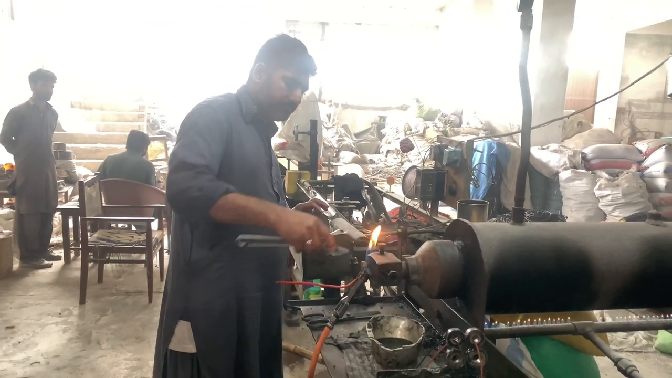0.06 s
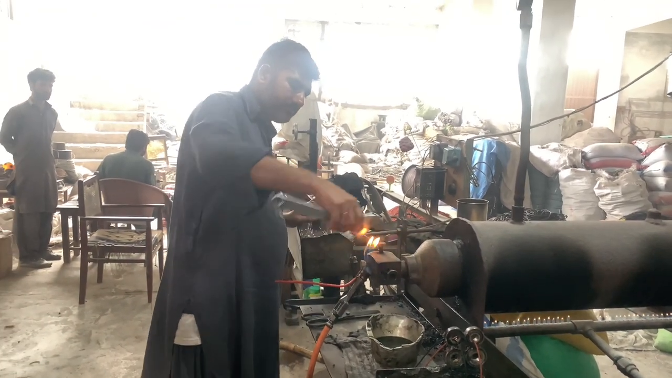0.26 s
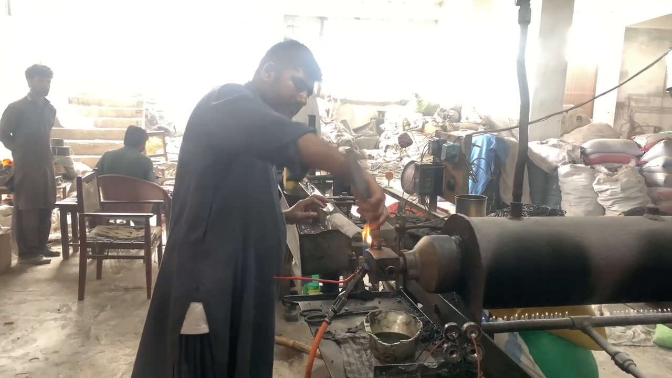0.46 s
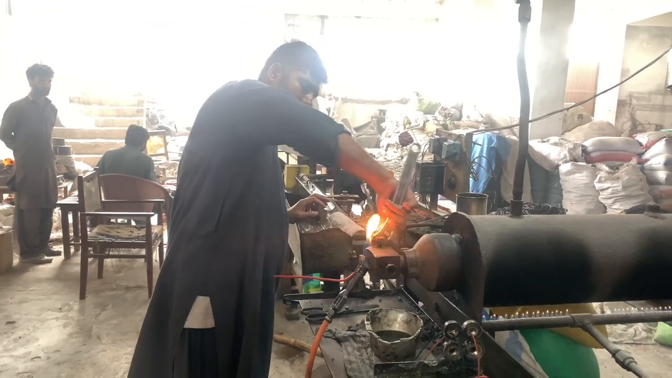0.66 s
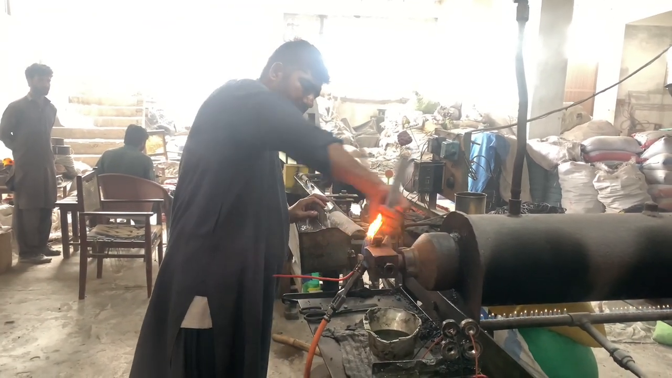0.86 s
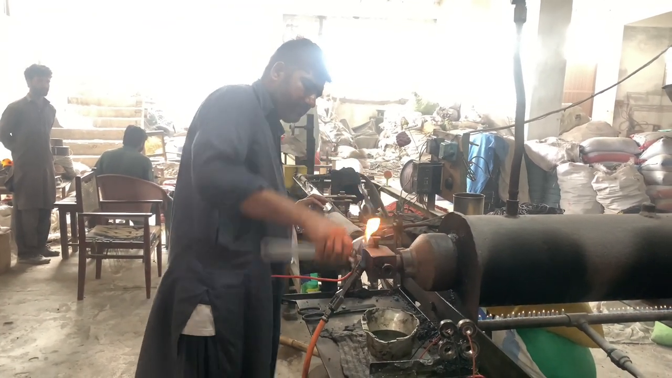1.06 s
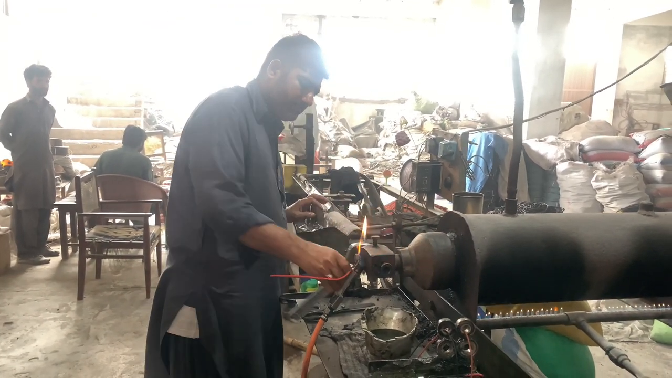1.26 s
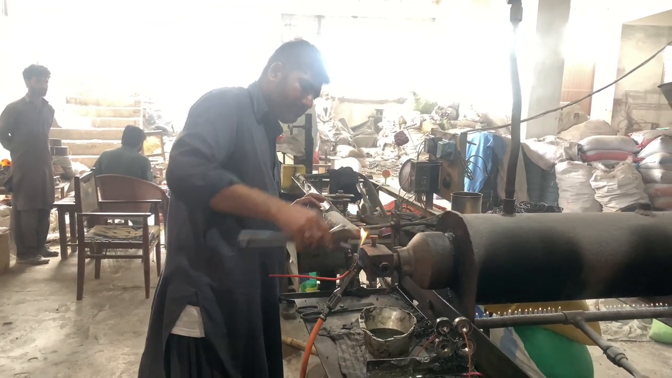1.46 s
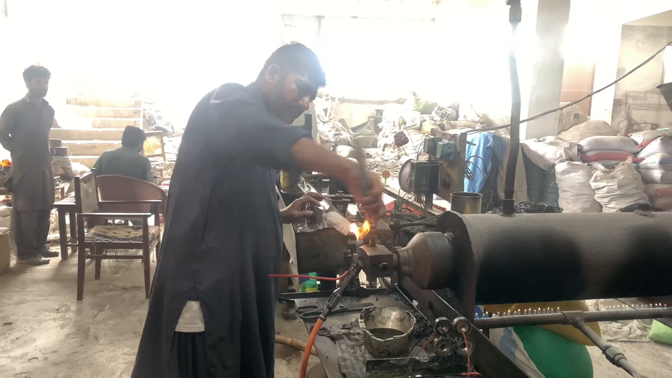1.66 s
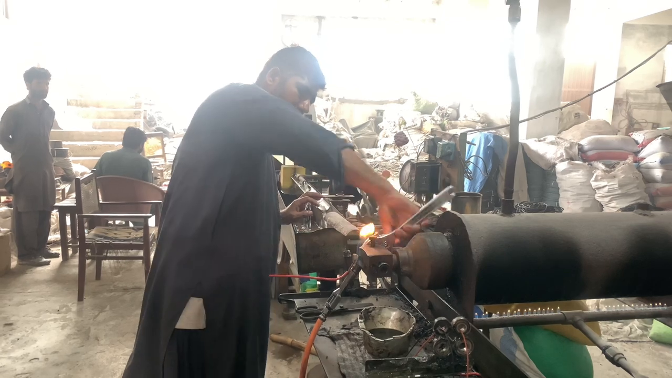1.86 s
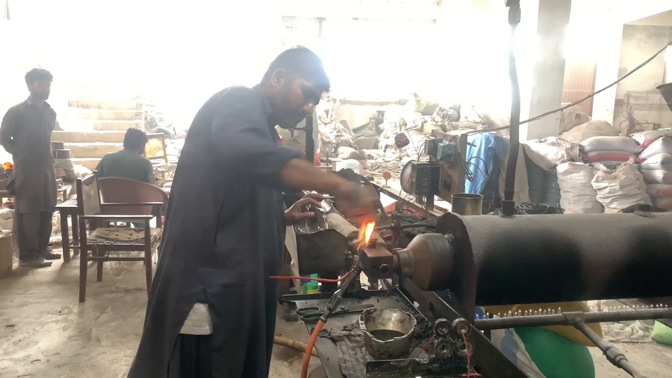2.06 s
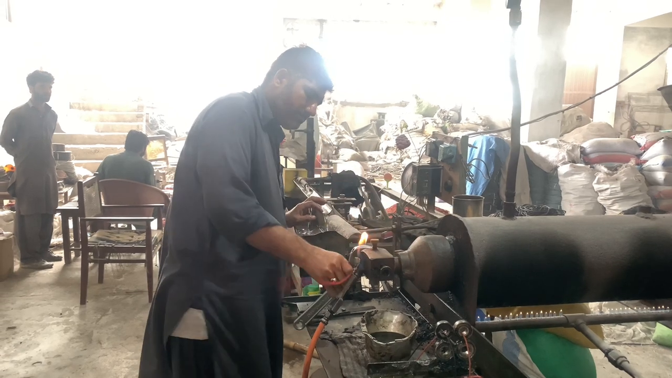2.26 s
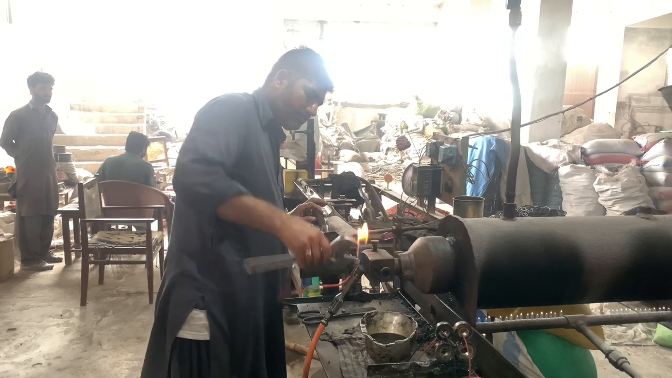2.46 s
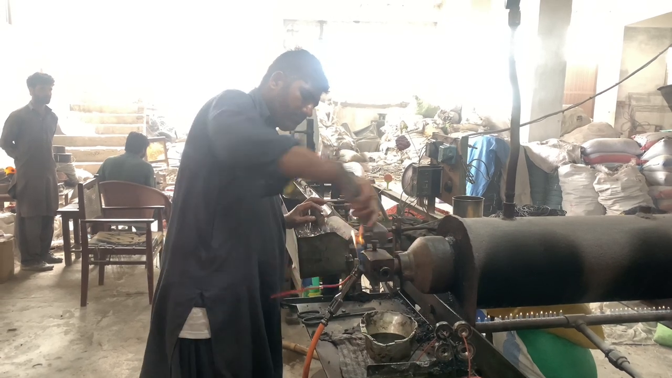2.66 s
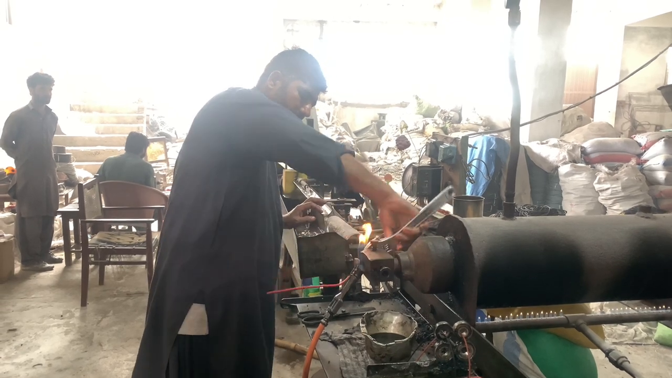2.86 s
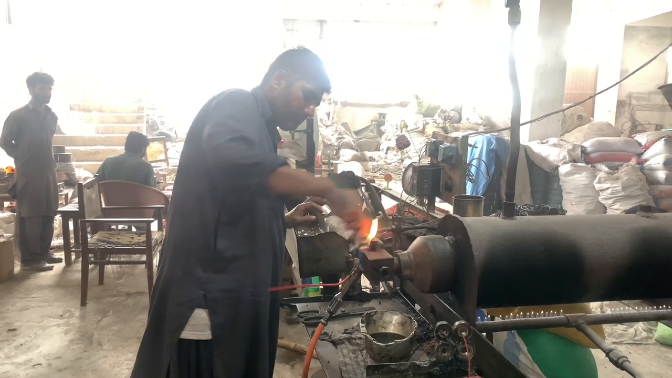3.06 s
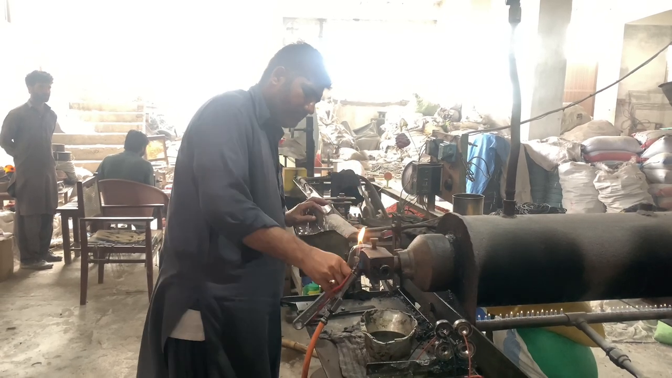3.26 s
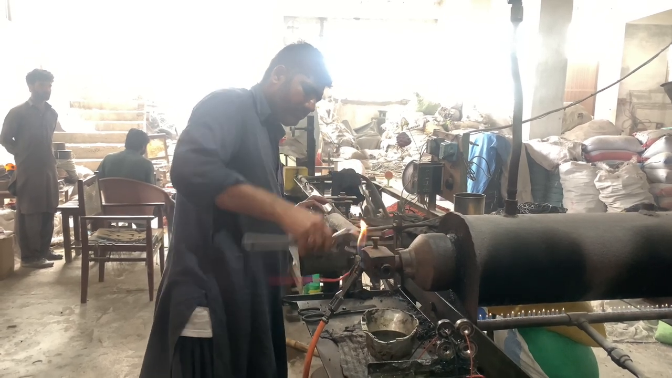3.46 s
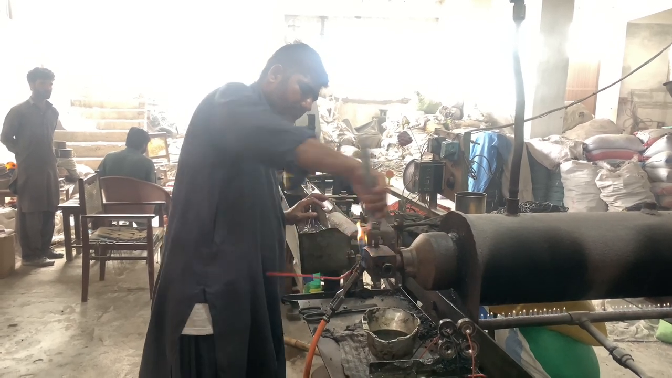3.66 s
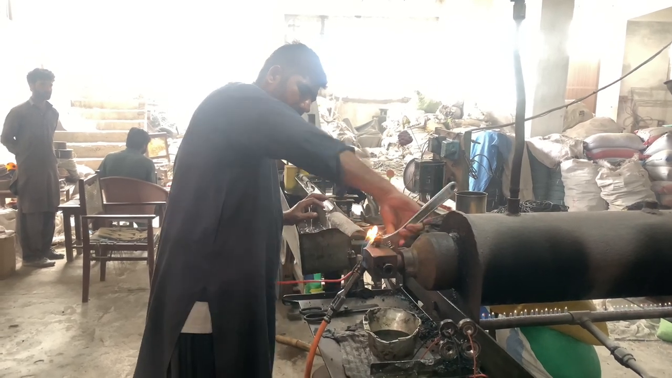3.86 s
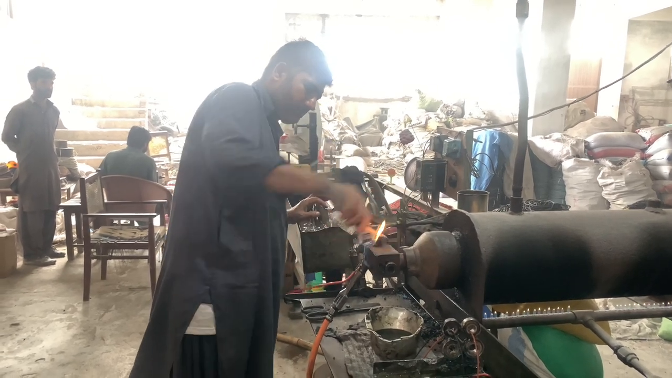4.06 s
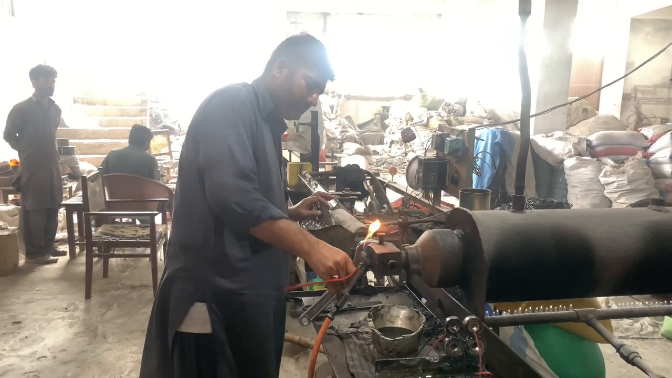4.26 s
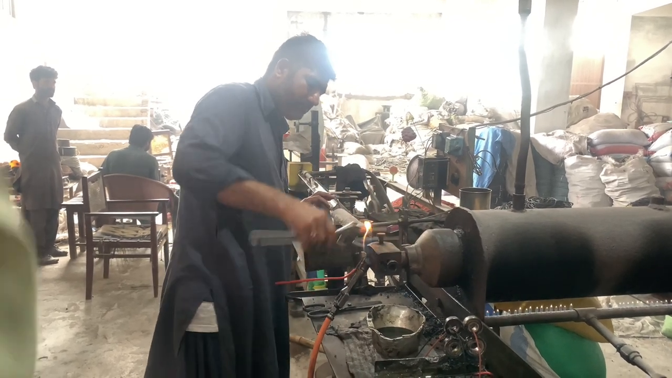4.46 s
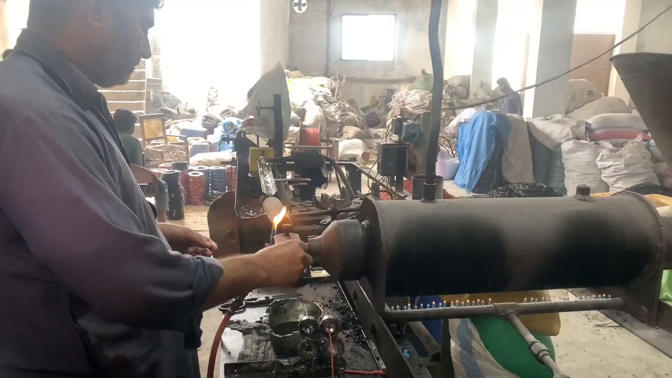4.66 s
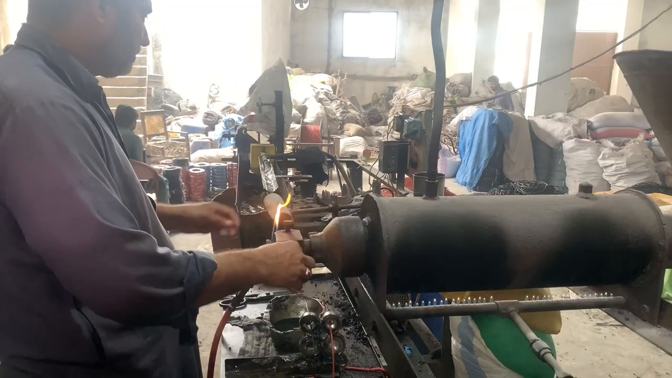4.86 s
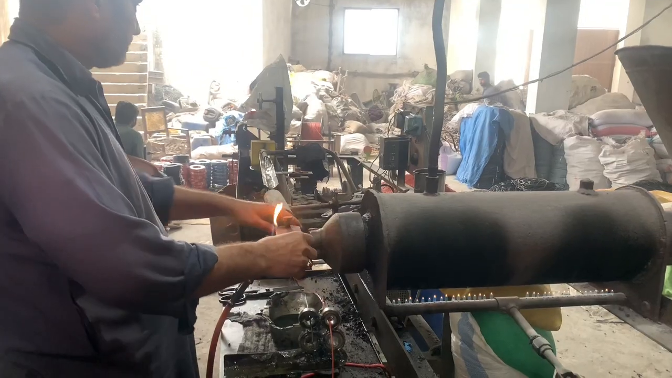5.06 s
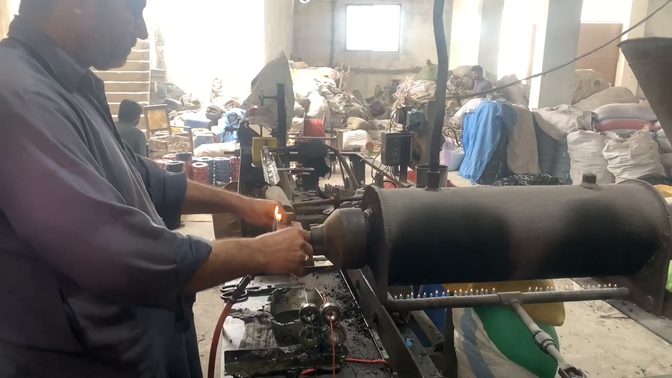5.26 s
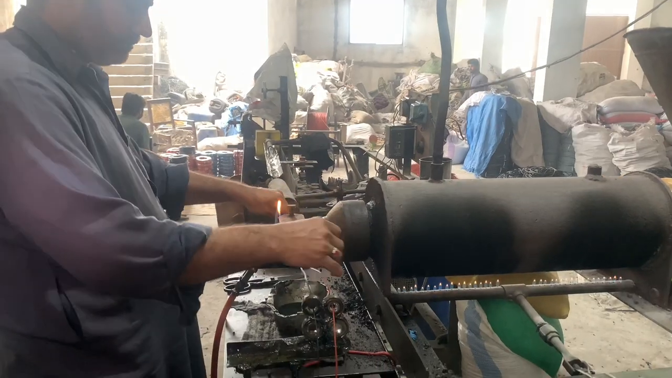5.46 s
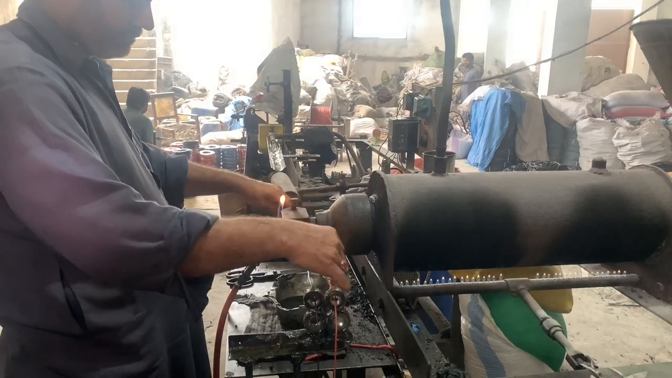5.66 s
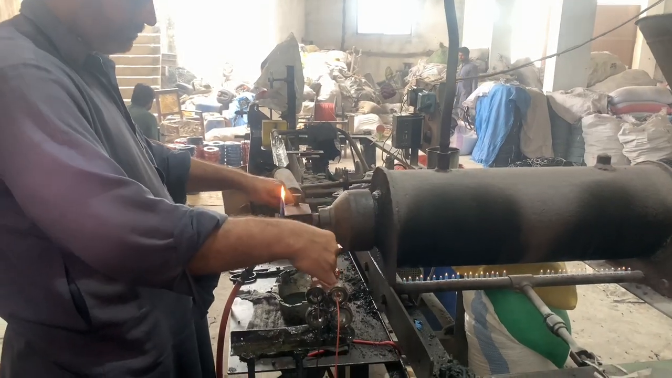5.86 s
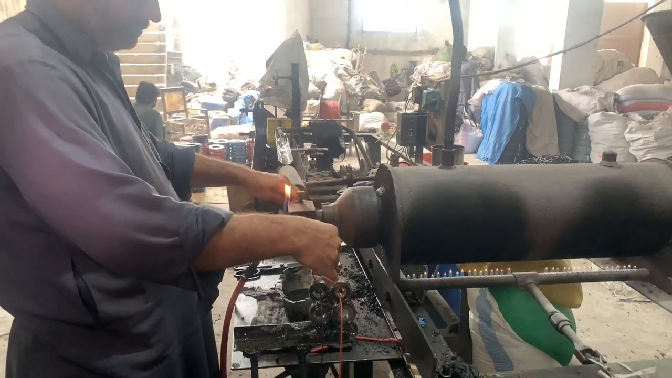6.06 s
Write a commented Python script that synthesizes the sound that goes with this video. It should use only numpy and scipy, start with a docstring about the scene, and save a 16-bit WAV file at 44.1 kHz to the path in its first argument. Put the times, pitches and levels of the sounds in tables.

```python
"""The hum and rumble of a running plastic extruder come first, in a factory hall: wavering sines and shaped noise.
A worker's flat hand tool clinks, skids and knocks on the die: ringing modes with short bursts of gritty noise.
Between these light touches it strikes the steel head four times: noise cracks, a rattle and dying modes.
Each blow makes the recorder's limiter duck. After a brief near-silence the machine is nearer,
and a soft sizzle, noise with faint resonances, swells twice."""
import sys
import numpy as np
from scipy import signal
from scipy.fft import rfft, irfft
from scipy.io import wavfile
from scipy.ndimage import uniform_filter1d, minimum_filter1d

SR = 44100
rng = np.random.default_rng(int(sys.argv[2]) if len(sys.argv) > 2 else 0)


def master(y):
    """Save y as 16-bit WAV."""
    cut = np.clip(np.atleast_2d(y).T, -1, 1)
    pcm = np.round(cut * 32767)  # scale
    wavfile.write(sys.argv[1], SR, pcm.astype(np.int16))


N = 269010
SILENCE_START_S, SILENCE_END_S = 4.554, 4.582  # the machine is heard from nearer after the start


def amp(db):
    """Turns decibels into an amplitude factor."""
    return 10 ** (np.asarray(db) / 20)


def evened(x):
    """Scales to rms 1."""
    return x / np.sqrt(np.mean(x ** 2) + 1e-20)


def read(points, hz):
    """Reads a curve at the given frequencies, on a log frequency axis."""
    f, value = np.transpose(points)
    return np.interp(np.log(hz + 1), np.log(f + 1), value)


def add(mix, s, sound):
    """Mixes a stereo sound in at s seconds."""
    part = mix[:, round(s * SR):][:, :sound.shape[1]]
    part += sound[:, :part.shape[1]]


def fade(t, t60):
    """Dies by 60 dB in t60 seconds."""
    return np.exp(-np.log(1000) * t / t60)


def drift(rate_hz):
    """Random wavering, mostly slower than rate_hz, rms 1."""
    hz = np.fft.rfftfreq(N, 1 / SR)
    spectrum = rfft(rng.standard_normal(N)) * np.exp(-(hz / rate_hz) ** 2)
    return evened(irfft(spectrum, N))


def tilt(hz, slope_db):
    """Brightness: slope_db per octave about 3 kHz, flat below 2 kHz."""
    return slope_db * np.log2(max(hz, 2000) / 3000)


def tilted(colour, slope_db):
    """A noise colour with its brightness tilted."""
    return [(hz, db + tilt(hz, slope_db)) for hz, db in colour]


# left-right likeness of noise: [f/Hz, likeness from -1 to 1, clipped to that range]
LIKENESS = [(40, 1.2), (90, 0.76), (180, 1.04), (350, 0.21), (600, -0.1), (1500, -0.21), (5000, 0.11),
            (14000, 0)]
# left-right balance of noise and modes: [f/Hz, level/dB of left over right]
BALANCE = [(60, 1), (300, 0.5), (650, 7), (1300, 1.5), (2400, 1.5), (4400, -2), (8000, -3.5), (15000, 1)]


def noise(colour, size):
    """Coloured noise at two microphones, rms 1: alike in the bass, unrelated in the treble."""
    hz = np.fft.rfftfreq(size, 1 / SR)
    a, b = rfft(rng.standard_normal((2, size)))
    same = np.clip(read(LIKENESS, hz), -1, 1)
    half_lean_db = read(BALANCE, hz) / 2
    left = a * amp(half_lean_db)
    right = (same * a + np.sqrt(1 - same ** 2) * b) * amp(-half_lean_db)
    return evened(irfft(np.array([left, right]) * amp(read(colour, hz)), size))


def ring(modes, t, tilt_db, spread, detune):
    """Dying modes, detuned a little by each contact; the higher ones reach the two microphones out of step."""
    out = np.zeros((2, len(t)))
    side = np.array([[.5], [-.5]])
    for hz, db, t60 in modes:
        lag = side * spread * min(hz / 2500, 1) * rng.choice([-1, 1])  # radians
        phase = 2 * np.pi * rng.random() + lag
        level_db = db + tilt_db * np.log2(hz / 3000) + side * read(BALANCE, hz)
        pitch_hz = hz * (1 + detune * rng.uniform(-1.6, 1))
        out += amp(level_db) * fade(t, t60) * np.sin(2 * np.pi * pitch_hz * t + phase)
    return out


# colour of the machine noise from the first place: [f/Hz, relative level/dB]
FAR_COLOUR = [(12, -43), (20, -16.5), (80, -2), (129, -9.5), (185, -2.5), (372, -12.5), (519, -11),
              (834, -17), (1720, -19), (1870, -20.5), (8640, -42.5), (9660, -40), (11700, -55),
              (13100, -45), (15500, -68)]
# colour of the machine noise from nearer: [f/Hz, relative level/dB]
NEAR_COLOUR = [(12, -56), (20, -14), (76, -2.5), (180, -6.5), (225, -9), (266, -3.5), (958, -21),
               (1340, -20), (1980, -25), (2400, -29), (2610, -29), (4190, -35), (6190, -46), (13100, -49.5),
               (15500, -87)]
# motor hum partials: [multiple of the motor frequency, rms level/dB before wavering and distance]
HUM_PARTIALS = [(1, -50.5), (2, -53.5), (3, -56), (7, -72)]
MOTOR_HZ = 88.06  # before wavering
FAR_DB, NEAR_DB = -38.5, -37.5  # noise level, before the sink
HUM_FAR_DB, HUM_NEAR_DB = 0.5, 6  # added to the partials
SINK_AT_S, SINK_S, SINK_DB = 2.2, 0.25, -7  # the machine sinks about the second blow and stays low till nearer


def machine():
    """Rumble and burner roar, with the wavering hum of the motor, which is stronger from nearby."""
    t = np.arange(N) / SR
    near = t > SILENCE_START_S
    roar = np.where(near, amp(NEAR_DB) * noise(NEAR_COLOUR, N), amp(FAR_DB) * noise(FAR_COLOUR, N))
    roar = roar * amp(0.59 * drift(50))
    turns = np.cumsum(MOTOR_HZ * (1 + 0.0083 * drift(4.06))) / SR
    hum = np.zeros(N)
    for multiple, db in HUM_PARTIALS:
        wave = np.sin(2 * np.pi * (round(multiple) * turns + rng.random()))
        hum += amp(db + 0.49 * drift(13)) * np.sqrt(2) * wave
    hum = hum * amp(np.where(near, HUM_NEAR_DB, HUM_FAR_DB))
    sunk = np.clip((t - SINK_AT_S) / SINK_S, 0, 1) * ~near
    return amp(SINK_DB * sunk) * (roar + hum)


# colour of the fizz: [f/Hz, relative level/dB]
SIZZLE_COLOUR = [(300, -0.5), (900, 1.5), (2100, 1.5), (4000, -3.5), (6000, -12), (10500, -16),
                 (12000, -36), (13500, -23), (15500, -49)]
# faint resonances in the sizzle: [f/Hz, width/Hz, boost level/dB]
SIZZLE_RINGS = [(1055, 40, 7), (1900, 24, 21), (2035, 22, 12), (2190, 18, 17)]
# swells: [t/s, rise/s, top level/dB, fall/(dB/s), brightness/(dB/octave), squeal share at the start 0-1]
SWELLS = [(5.21, 0.037, -41.5, 24, -1.5, 0.17), (5.46, 0.15, -41, 42, 1, 0.27)]
SQUEAL_GROWTH_PER_S = 6.7  # in units of the starting share


def sizzle():
    """A soft fizz that swells twice and dies away; a faint squeal of narrow resonances grows in it."""
    hz, out = np.fft.rfftfreq(N, 1 / SR), np.zeros((2, N))
    rings_db = sum(db / (1 + (2 * (hz - centre) / width) ** 2) for centre, width, db in SIZZLE_RINGS)
    for s, rise, top_db, fall_db, slope_db, squeal in SWELLS:
        age = np.arange(N) / SR - s
        plain = noise(tilted(SIZZLE_COLOUR, slope_db), N)
        ringing = irfft(rfft(plain) * amp(rings_db), N)
        share = np.clip(squeal * (1 + SQUEAL_GROWTH_PER_S * age), 0, 1)
        level = np.clip(age / rise, 0, 1) * amp(top_db - fall_db * np.maximum(age - rise, 0))
        out += level * (plain + share * (ringing - plain))
    return out * amp(1.0 * drift(29))


# modes of the hand tool: [f/Hz before detuning, relative level/dB, t60/s before the hand damps it]
TOOL_MODES = [(2370, 1, 0.13), (3280, -21, 0.029), (3783, -2, 0.062), (3864, -5, 0.078), (4460, -8, 0.064),
              (5380, -11.5, 0.17), (6120, -14, .08), (6290, -13, 0.057), (6850, -19, 0.033),
              (8010, -13, 0.084), (9660, -10, 0.045), (9650, -5, 0.028), (10710, -8.5, 0.031),
              (13820, -14, .025)]
SPOT_DB, SPOT_WIDTH_HZ = 10.5, 200  # the spot of contact favours the modes near one frequency


def tool_ring(t, slope_db, spot_hz, spread, detune):
    """The tool's modes as one spot of contact excites them, rms 1 at the start."""
    modes = []
    for hz, db, t60 in TOOL_MODES:
        favour_db = SPOT_DB * np.exp(-((hz - spot_hz) / SPOT_WIDTH_HZ) ** 2)
        modes.append((hz, db + favour_db + 1.4 * rng.standard_normal(), t60))
    tone = ring(modes, t, slope_db, spread, detune)
    return tone / tone[:, :SR // 100].std()


# colour of the grit of a skidding edge: [f/Hz, relative level/dB]
GRIT_COLOUR = [(500, 5), (2400, 8), (3100, 6), (3900, 16), (4900, 1), (6800, 8.5), (8900, -10.5),
               (9700, 7.5), (11500, -24), (12700, 2), (14000, -25), (15600, -17)]


def touch(contact_s, slope_db, ring_db, spot_hz):
    """The tool slides for a moment: its ring builds as the contact decays, under a gritty hiss."""
    t = np.arange(SR // 4) / SR
    contact = np.exp(-t / contact_s)
    tone = tool_ring(t, slope_db - 0.5, spot_hz, spread=0.7, detune=0.0049) * (1 - contact ** 4)
    tone *= fade(t, 0.16)  # the hand damps the tool
    grit_level = (contact + amp(-4.5) * fade(t, 0.0092)) * (1 - fade(t, 0.012))
    grit = noise(tilted(GRIT_COLOUR, slope_db), len(t)) * grit_level
    return amp(ring_db) * tone + grit


# single light touches: [t/s, level/dB, brightness/(dB/octave), ring level/dB against the grit]
CLINKS = [(0.212, -40, 11, -3.5), (0.418, -41.5, -2.5, 2), (0.43, -36.5, -3, 0), (0.458, -39, -5, -1),
          (0.508, -28, -1.5, -1.5), (0.5771, -29, 0, -12), (0.6813, -41, 3, 7), (2.156, -41.5, 8, -8),
          (3.138, -50, 5, -17)]


def clinks():
    """The tool ticks against the die, each a brief ringing touch."""
    out = np.zeros((2, N))
    for s, level_db, slope_db, ring_db in CLINKS:
        add(out, s, amp(level_db) * touch(0.006, slope_db, ring_db, spot_hz=3630))
    return out


# skids: [landing t/s, landing level/dB, brightness/(dB/octave), graze level/dB against the landing]
SKIDS = [(1.6867, -27.5, 0.5, -13), (2.687, -35, 5.5, -26), (3.683, -37, 1, -8)]
GRAZE_LEAD_S, GRAZE_CONTACT_S = 0.056, 0.02
BOUNCE_S, BOUNCE_DB, SKID_CONTACT_S = 0.0145, -3.5, 0.0089


def skids():
    """Three touches in a row: a soft graze, the skidding landing and a bounce."""
    out = np.zeros((2, N))
    for s, level_db, slope_db, graze_db in SKIDS:
        graze = (-GRAZE_LEAD_S, graze_db, GRAZE_CONTACT_S)
        landing = (0, 0, SKID_CONTACT_S)
        bounce = (BOUNCE_S, BOUNCE_DB, SKID_CONTACT_S)
        for delay, db, contact_s in (graze, landing, bounce):
            sound = touch(contact_s, slope_db, ring_db=2.5, spot_hz=4480)
            add(out, s + delay, amp(level_db + db) * sound)
    return out


# firm knocks: [t/s, level/dB, brightness/(dB/octave), ring level/dB against the clack, favoured mode f/Hz]
KNOCKS = [(0.7285, -23.5, -0.5, 1, 2380), (1.8436, -27, -6.5, -1, 4480), (2.8482, -23.5, 2.5, -8, 6160),
          (3.8359, -31, 0.5, -4, 2380)]
# colour of the dead clack: [f/Hz, relative level/dB]
CLACK_COLOUR = [(200, -20), (800, 0), (1700, 2.5), (2300, -7), (2800, -25.5), (3350, 12), (4100, -15),
                (6500, -6), (9000, -19.5), (9900, -3.5), (11500, -29), (13300, -19), (16000, -44)]
KNOCK_RING_TILT_DB = -0.5  # per octave: the knock's ring is barely duller than its clack


def knocks():
    """Pressed hard on the die, the tool clacks and its ring is damped."""
    out, t = np.zeros((2, N)), np.arange(SR // 4) / SR
    for s, level_db, slope_db, ring_db, spot_hz in KNOCKS:
        tone = tool_ring(t, slope_db + KNOCK_RING_TILT_DB, spot_hz, spread=.4, detune=0.0028)
        tone = tone * fade(t, 0.043)
        clack = noise(tilted(CLACK_COLOUR, slope_db), len(t)) * fade(t, 0.022) * (1 - fade(t, 0.0007))
        add(out, s, amp(level_db) * (clack + amp(ring_db) * tone))
    return out * amp([[1.2], [-1.2]])  # a little to the left


# heavy blows: [t/s, force level/dB, rebound delay/s, rebound level/dB against the blow, brightness/(dB/octave)]
BLOWS = [(1.1433, 2, 0.0044, 1.5, 0), (2.2304, -4.5, 0.0038, -7.5, -1), (3.2115, -4.5, .004, -4, -0.5),
         (4.2019, -6, 0.0056, -0.5, -0.5)]
# modes of the struck head: [f/Hz before detuning, relative level/dB, t60/s]
HEAD_MODES = [(1070, -26, 0.15), (1161, -15.5, 0.091), (1759, -14.5, 0.065), (1920, -10, 0.041),
              (2110, -18, 0.2), (2128, -21, 0.2), (2464, -7.5, 0.098), (2543, 0, 0.052), (2670, 3.5, 0.021),
              (2826, -8, 0.038), (3002, 2, 0.032), (3308, -5, 0.092), (3584, -5, 0.034),
              (3840, -7.5, 0.067), (4270, -16.5, 0.14), (4314, -8.5, 0.037), (4566, -10.5, 0.074),
              (4955, -13.5, 0.075), (5040, -11.5, 0.037), (5300, -14, 0.06), (5760, -17, 0.086),
              (6070, -17, 0.08), (6405, -8.5, 0.027), (6380, -17, 0.031), (7400, -10, 0.031),
              (7800, -15, 0.069), (8370, -14, 0.09), (8600, -25, 0.024), (9230, -18.5, 0.063),
              (10340, -24, 0.068)]
# colour of the dense crack of steel on steel: [f/Hz, relative level/dB]
CRACK_COLOUR = [(50, -24), (170, 4.5), (450, -12), (800, 3), (1500, -0.5), (2600, 6.5), (4000, 8.5),
                (6300, -21.5), (7500, -14), (10500, -2.5), (12000, -20), (14000, -11), (15500, -51)]
# colour of the machine's short rattle after each crack: [f/Hz, relative level/dB]
RATTLE_COLOUR = [(400, -16), (800, -9), (1500, -0.5), (2700, -1.5), (4300, -2.5), (6500, 4), (10500, -28),
                 (15000, -33)]
HEAD_DB, CRACK_DB, RATTLE_DB = 1, 4, -8.5  # added to the force
CRACK_T60_S, RATTLE_T60_S = 0.028, 0.11


def blows():
    """The tool lands and rebounds: two cracks, each with a short rattle of the machine, while the head rings on."""
    out, t = np.zeros((2, N)), np.arange(SR // 2) / SR
    for s, db, delay, rebound_db, tilt_db in BLOWS:
        head = ring(HEAD_MODES, t, tilt_db, spread=0.59, detune=0.0039) * (1 - fade(t, 0.0096))
        add(out, s, amp(db + HEAD_DB) * head)
        for at, hit_db in ((s, db), (s + delay, db + rebound_db)):
            crack = noise(CRACK_COLOUR, len(t)) * fade(t, CRACK_T60_S) * (1 - fade(t, 0.0088))
            rattle = noise(RATTLE_COLOUR, len(t)) * fade(t, RATTLE_T60_S) * (1 - fade(t, 0.0061))
            add(out, at, amp(hit_db) * (amp(CRACK_DB) * crack + amp(RATTLE_DB) * rattle))
    return out * amp([[1.2], [-1.2]])  # a little to the left


def nearby(x, t60):
    """Quick reflections off the machine and the floor, as decaying random taps."""
    t = np.arange(SR // 2) / SR
    taps = rng.standard_normal((2, len(t))) * fade(t, t60) * (t > .003)
    return signal.fftconvolve(x, taps / np.linalg.norm(taps[0]), axes=1)[:, :N]


def hall(x):
    """Dense echoes off walls and stacked sacks: noise whose middle frequencies die last."""
    # echo decay: [f/Hz, t60/s]
    t60 = [(200, 0.43), (1000, 1.15), (2800, 0.84), (6000, 0.85), (10000, 0.58), (15000, 0.35)]
    hz, t, z = signal.stft(rng.standard_normal((2, SR)), SR, nperseg=256)
    tail = signal.istft(z * fade(t, read(t60, hz)[:, None]), SR, nperseg=256)[1]
    tail = tail * (1 - np.exp(-np.arange(tail.shape[1]) / SR / 0.002))  # soft onset
    return signal.fftconvolve(x, tail / np.linalg.norm(tail[0]), axes=1)[:, :N]


def scene():
    """Heavy blows fill the hall; the light touches stir it too, over the machine and its sizzle."""
    background = machine() + sizzle()
    light = clinks() + skids() + knocks()
    heavy = blows()
    close_echoes = nearby(amp(-1) * heavy + amp(-4.5) * light, t60=0.22)
    hall_echoes = hall(amp(-15.0) * heavy + amp(-10.5) * light)
    near = np.arange(N) / SR > SILENCE_START_S
    turned = amp(np.array([[-.8], [.8]]) * near)  # from nearby the machine lies to the right
    return heavy + light + close_echoes + hall_echoes + turned * background


def limiter(x, ceiling_db, hold, recovery_db):
    """Pulls the gain down within milliseconds, holds it for hold seconds, recovers by recovery_db a second."""
    power_db = 10 * np.log10(abs(uniform_filter1d((x ** 2).mean(0), size=260)) + 1e-12)
    excess_db = np.maximum(power_db - ceiling_db, 0)
    span = max(int(hold * SR), 3)
    held_db = -minimum_filter1d(-excess_db, span, origin=(span - 1) // 2)  # the largest recent excess
    fall = np.arange(N) / SR * recovery_db
    cut_db = np.maximum.accumulate(held_db + fall) - fall
    return x * amp(-uniform_filter1d(cut_db, size=100))


def record(dry):
    """Bass cut, limiter, rounded peaks, a brief near-silence before the nearer place, and the band limit."""
    t = np.arange(N) / SR
    dry = signal.sosfilt(signal.butter(4, 34, "high", fs=SR, output="sos"), dry)
    limited = limiter(dry, ceiling_db=-11.5, hold=0.056, recovery_db=63)
    rounded = limited / (1 + (limited / .9) ** 4) ** (1 / 4)
    live = uniform_filter1d(1. * ((t < SILENCE_START_S) | (t > SILENCE_END_S)), size=100)
    out = rounded * np.maximum(live, amp(-33))
    low_pass = signal.firwin(255, 15500, window=("kaiser", 9), fs=SR)  # edge in Hz
    return signal.oaconvolve(out, low_pass[None], "same")


dry = scene()
out = record(dry)
master(out)
```